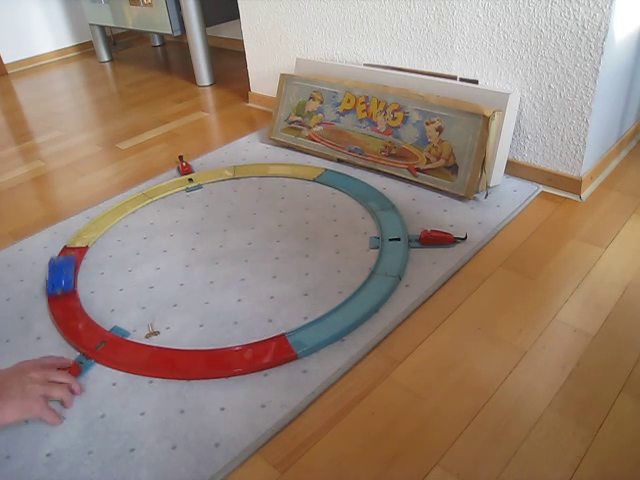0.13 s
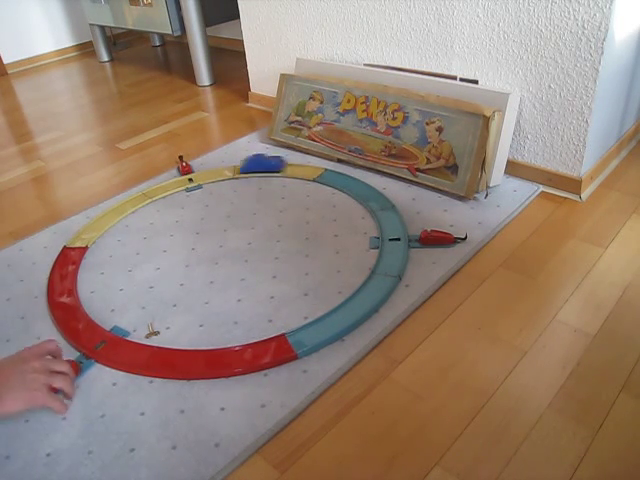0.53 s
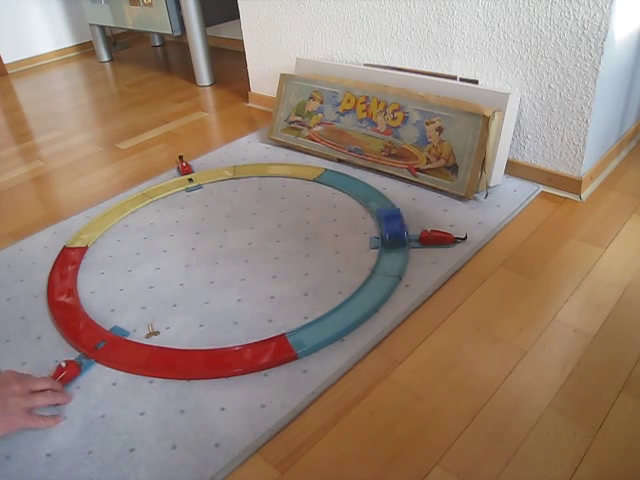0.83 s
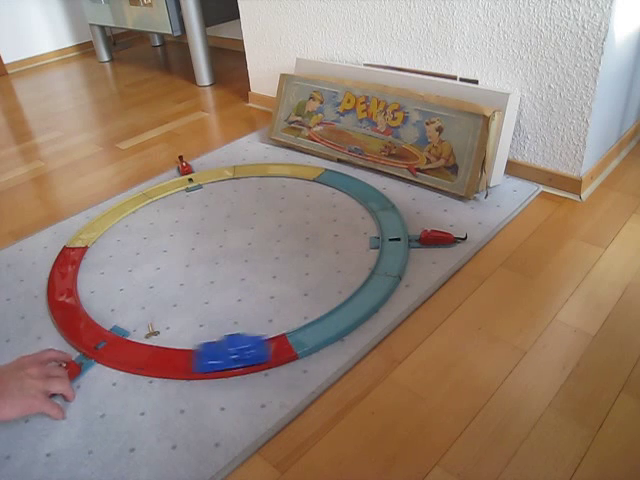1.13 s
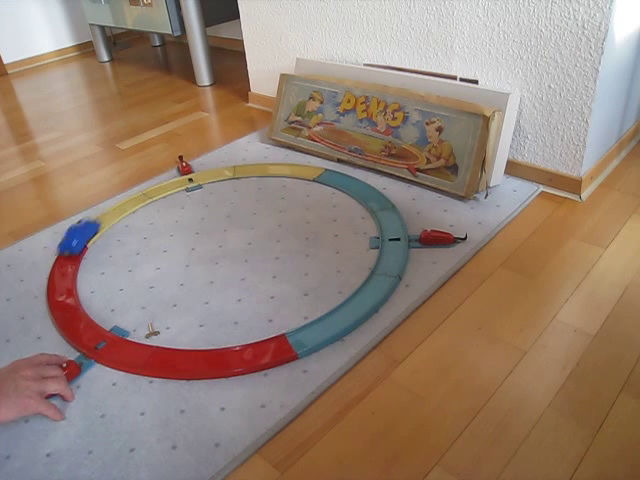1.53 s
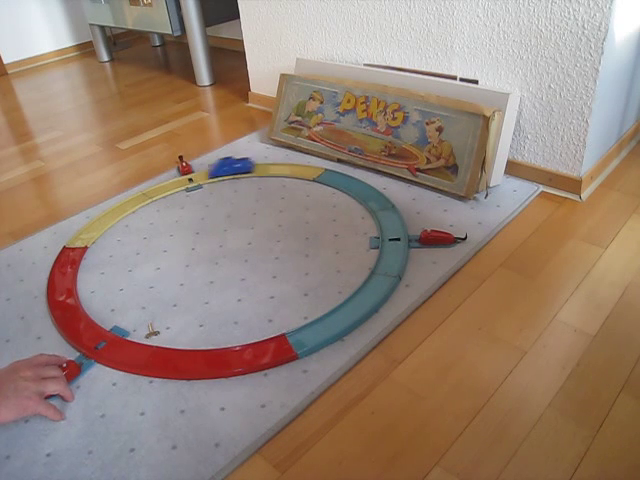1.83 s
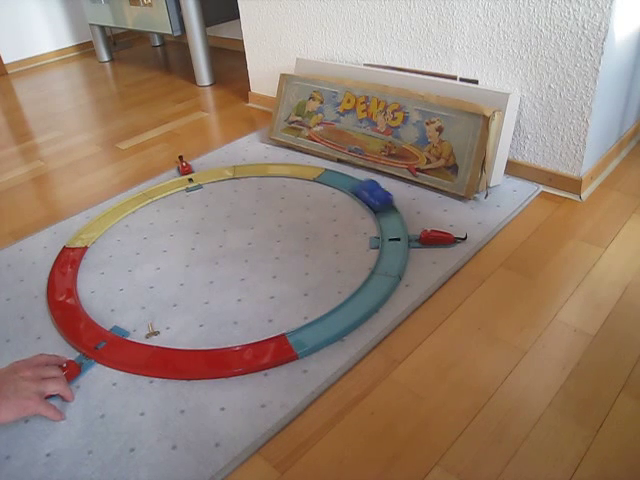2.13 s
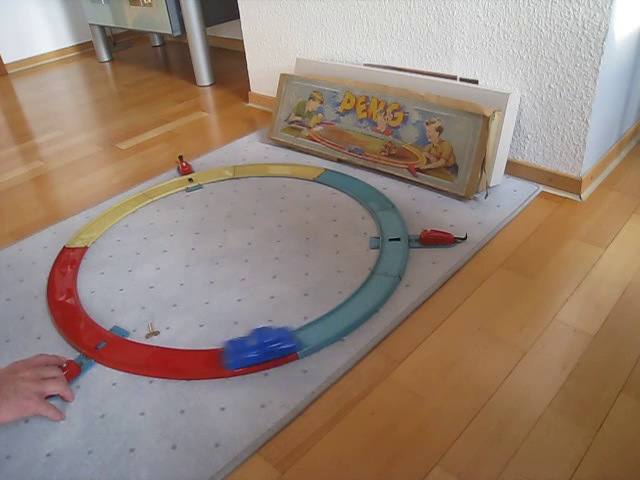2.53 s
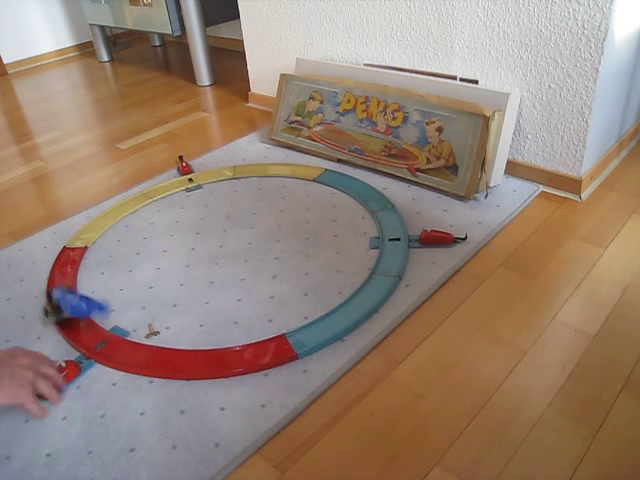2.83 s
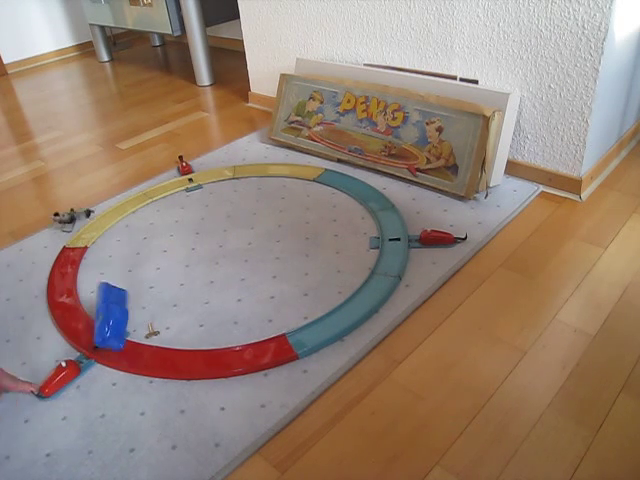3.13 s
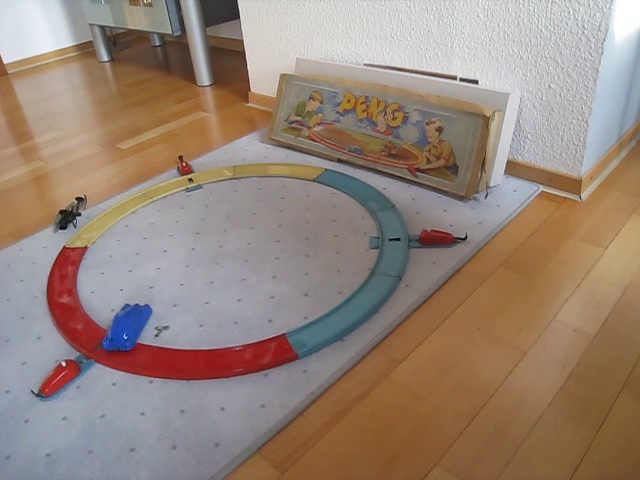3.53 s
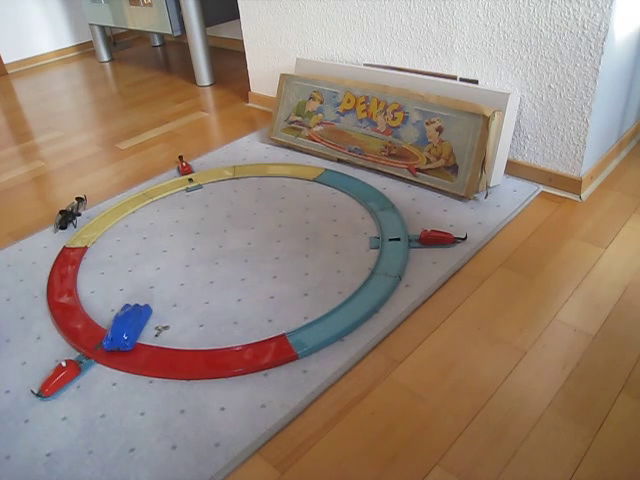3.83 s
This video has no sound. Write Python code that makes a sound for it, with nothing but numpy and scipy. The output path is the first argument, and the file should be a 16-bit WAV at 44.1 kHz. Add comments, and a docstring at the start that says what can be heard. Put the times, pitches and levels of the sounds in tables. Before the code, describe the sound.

A wind-up tin toy car rattles around a metal track in a small room, with a clank at the start, fizzing gears and faintly ringing rails. A wheel gives a thin, brief squeak near 0.8 seconds. At about 2.8 seconds the car derails with a loud crash and dull thud, then tumbles with sharp clanks, motor racing. It lands around 3.2 seconds and the whirring dies away by 3.7.

```python
"""A clockwork tin car rattles round a tin track on a rug, wheels chattering and gear teeth fizzing.
The rails sing under it, and a rubbing wheel squeaks once. It hits the points, derails and tumbles
with the motor racing, then clanks onto its side and runs down. The rug adds a dull thud to the knocks,
a small room answers, and automatic gain control ducks on the loud crashes."""
import sys
import numpy as np
from scipy import signal
from scipy.fft import rfft, irfft, next_fast_len
from scipy.io import wavfile
from scipy.ndimage import uniform_filter1d, map_coordinates

SR = 44100
rng = np.random.default_rng(int(sys.argv[2]) if len(sys.argv) > 2 else 0)


def unload_audio(sound):
    """Save the sound as a 16-bit wav file, at the path given as the first command line argument."""
    columns = np.transpose(np.atleast_2d(sound))
    # keep every value between -1 and 1, then stretch to whole-number steps
    steps = np.round(np.clip(columns, -1, 1) * 32767)
    wavfile.write(sys.argv[1], SR, steps.astype(np.int16))


N = 176400

DERAIL_S, LAND_S = 2.768, 3.235
TEETH_PER_S = 2900
# the clockwork racing and running down off the rails: t/s, whirr level/dB, fizz level/dB
RUN_DOWN = [(2.78, -38, -30), (2.85, -25, -16.5), (2.91, -23.5, -23), (2.99, -29, -24), (3.13, -28, -26),
            (3.2, -38.5, -23), (3.25, -22.5, -27.5), (3.32, -24.5, -31), (3.39, -33, -26.5),
            (3.51, -43, -39.5), (3.6, -49.5, -56), (3.8, -64, -88)]
# hard knocks of the car: t/s, clank level/dB, clash level/dB, tick level/dB, thud level/dB
CAR_KNOCKS = [(.004, -7, -8.5, -9.5, -42), (0.835, -30, -17, -18, -50), (2.7633, -15, -10.5, -10.5, -30),
              (2.7698, 0, 2, 9.5, -1.5), (2.7869, -13, 6, -8, -23), (2.891, -5.5, -10, -11, -45),
              (3.0066, -3.5, -5.5, -9.5, -11), (3.063, -14, -16, -17, -50),
              (3.2232, -29, -14.5, -13.5, -55), (3.2352, -8.5, -10.5, -13, -42),
              (3.2675, -11.5, -22, -28, -50)]
# resonances of the car's tin body: f/Hz, width/Hz, level/dB
BODY_MODES = [(1330, 92, 2.5), (2573, 82, 4)]


def amp(db):
    """Decibels to gain."""
    return 10 ** (np.asarray(db) / 20)


def unit(x):
    """Scale to rms 1."""
    return x / np.sqrt(np.mean(x ** 2) + 1e-20)


def clock():
    """The time of every sample, in seconds."""
    return np.arange(N) / SR


def curves(rows):
    """An automation curve for each column after the time."""
    times, *columns = np.transpose(rows)
    return [np.interp(clock(), times, column) for column in columns]


def after(start_s, fade=0.021):
    """A linear fade-in that begins at start_s."""
    return np.clip((clock() - start_s) / fade, 0, 1)


def wobble(rate):
    """Smooth random modulation, rate knots a second."""
    return map_coordinates(rng.standard_normal(2000), [clock() * rate], mode="wrap")


def grid():
    """The frequency axis of the filters, in Hz."""
    return np.fft.rfftfreq(2 * next_fast_len(N // 2 + 8192), 1 / SR)


def filtered(x, response):
    """x through a response scaled to keep the power of white noise."""
    size = 2 * (len(response) - 1)
    return irfft(rfft(x, size) * response / np.sqrt(np.mean(abs(response) ** 2)))[:N]


def colour(points):
    """A minimum-phase EQ curve through points of f/Hz, level/dB."""
    hz, db = np.transpose(points)
    gain = amp(np.interp(np.log(grid() + 1), np.log(hz + 1), db))
    cepstrum = irfft(np.log(gain + 1e-6))
    causal = np.r_[cepstrum[0], 2 * cepstrum[1:len(cepstrum) // 2]]
    return np.exp(rfft(causal, len(cepstrum)))


def ringing(modes):
    """A resonator bank of alternating polarity, from rows of f/Hz, width/Hz, level/dB."""
    f = grid()
    return sum((-1) ** k * amp(db) * 1j * f * width / (hz * hz - f * f + 1j * f * width)
               for k, (hz, width, db) in enumerate(modes))


def ticks(per_s, scatter_db, t60):
    """Irregular small contacts of uneven size, each a very short noise burst."""
    hits = (rng.random(N) < per_s / SR) * amp(scatter_db * np.clip(rng.standard_normal(N), -2, 2))
    power = signal.lfilter([1], [1, -amp(-120 / (t60 * SR))], hits ** 2)
    return unit(np.sqrt(power) * rng.standard_normal(N))


def bursts(times, levels_db, t60):
    """A dying burst of noise at each time."""
    out, t = np.zeros(N + SR), np.arange(SR // 4) / SR
    decay = np.exp(-np.log(1000) * t / t60)
    for start_s, db in zip(times, levels_db):
        out[round(start_s * SR):][:len(t)] += amp(db) * decay * rng.standard_normal(len(t))
    return out[:N]


def shifting(x, depth_db):
    """Drifting peaks and dips: the tin's fine resonances change as the car moves on."""
    spectrum = signal.stft(x, nperseg=1024)[2]
    patches = uniform_filter1d(rng.standard_normal(spectrum.shape), size=4, axis=0)
    patches = uniform_filter1d(patches, size=7, axis=1)
    return unit(signal.istft(spectrum * amp(depth_db * unit(patches)))[1][:N])


def wheels():
    """Wheels chatter on the tin rails and bump over their joints, setting the rails ringing."""
    # rattle along the laps: t/s, level/dB
    laps = [(0, -19.5), (.15, -21.5), (.33, -20.5), (.7, -21), (1.05, -19.5), (1.35, -21.5), (1.7, -20),
            (2.0, -21.5), (2.7, -19.5)]
    # bumps over the rail joints: t/s, level/dB
    joints = [(.152, -16), (.2, -19.5), (.306, -16), (.352, -15.5), (.977, -18.5), (1.254, -17),
              (1.313, -19), (1.856, -27), (2.064, -18.5), (2.116, -17.5)]
    # tone of wheels on tin: f/Hz, level/dB
    rattle_eq = [(59, -46), (100, -44.5), (381, -21.5), (493, -13.5), (592, -13), (989, -4), (1480, -1),
                 (1750, -4.5), (2430, 0.5), (2760, -3.5), (3510, -0.5), (4450, -4.5), (8000, -13.5),
                 (10400, -20.5), (17600, -120)]
    # rail resonances: f/Hz, width/Hz, level/dB
    rail_modes = [(1430, 140, -13), (2450, 160, 12), (3460, 250, 18.5), (5040, 260, 18)]
    crossing = after(0.757) * (1 - after(0.86, fade=0.07))  # the wheels run light here
    level_db = curves(laps)[0] - 5 * crossing + 0.37 * wobble(55)
    chatter = shifting(ticks(per_s=2200, scatter_db=2.0, t60=0.027), depth_db=1.9)
    bumps = bursts(*np.transpose(joints), t60=0.061)
    drive = chatter * amp(level_db) * (1 - after(DERAIL_S)) + bumps
    rail_ring = filtered(np.roll(drive, SR // 300), ringing(rail_modes))
    return filtered(drive, colour(rattle_eq)) + amp(-12) * rail_ring


def gears():
    """Gear teeth fizz, swelling with each turn of the axle, until the clockwork runs down."""
    # tone of the meshing teeth: f/Hz, level/dB
    fizz_eq = [(2000, -21), (4000, -7), (6500, -3.5), (7700, -6.5), (9500, 0), (11500, -2.5), (13000, 0),
               (14500, -4.5), (17000, -17.5)]
    far_s, lap_s, axle_hz = 1.9, 1.26, 28.1
    far_side = np.cos(2 * np.pi * (clock() - far_s) / lap_s)  # faintest at the far side of each lap
    on_track_db = -27 - 0.9 * far_side + 0.53 * wobble(11.3)
    level_db = np.where(clock() < DERAIL_S, on_track_db, curves(RUN_DOWN)[1])
    turn = np.sin(2 * np.pi * np.cumsum(axle_hz * (1 + 0.088 * wobble(3.99))) / SR)
    teeth = ticks(TEETH_PER_S, scatter_db=-2, t60=0.007) * amp(1.5 * turn)
    return filtered(shifting(teeth, depth_db=1.9) * amp(level_db), colour(fizz_eq))


def room_tone():
    """A faint, steady bed of dark noise."""
    # tone of the background: f/Hz, level/dB
    bed_eq = [(12, -26), (20, -13), (280, -9.5), (17000, -30.5)]
    return amp(-51) * filtered(rng.standard_normal(N), colour(bed_eq))


def room(x, t60=0.4):
    """A small room's diffuse tail, new every fifth of a second as the car changes place."""
    t, out = np.arange(SR // 3) / SR, np.zeros(N + SR)
    block = SR // 5
    for start in range(0, N, block):
        tail = rng.standard_normal(len(t)) * np.exp(-np.log(1000) * t / t60)
        wet = signal.fftconvolve(x[start:start + block], tail / np.linalg.norm(tail))
        out[start:start + len(wet)] += wet
    return out[:N]


def knocks(t60=0.037):
    """Short crashes of tin ring the points, until the car lands on its hollow side panel."""
    # midrange body of a knock: f/Hz, level/dB
    clank_eq = [(200, -42), (600, -10.5), (1400, -4), (2300, -4.5), (5000, -7), (12000, -66)]
    # its bright splash: f/Hz, level/dB
    clash_eq = [(800, -28), (4700, 5), (6200, 3.5), (7100, 4), (8500, 4), (16000, -30)]
    # its sharp top edge: f/Hz, level/dB
    tick_eq = [(3000, -47), (9200, 6.5), (10500, 7), (12500, 13.5), (14500, -0.5), (17000, -19)]
    # resonances of the struck points: f/Hz, width/Hz, level/dB
    points_modes = [(1395, 20, -3), (4630, 21, 0), (7100, 55, -2)]
    times, *layers_db, _ = np.transpose(CAR_KNOCKS)
    crash = sum(filtered(bursts(times, db, t60), colour(eq))
                for db, eq in zip(layers_db, (clank_eq, clash_eq, tick_eq)))
    before_landing = crash * (1 - after(LAND_S))
    points = filtered(np.roll(before_landing, SR // 1000), ringing(points_modes))
    panel_mode = (1230, 300, 0)  # f/Hz, width/Hz, level/dB
    landing = bursts([LAND_S], levels_db=[-4], t60=t60)
    panel = filtered(landing, ringing(BODY_MODES + [panel_mode]))
    return crash + amp(-13.5) * points + panel


def rug_thuds():
    """The rug takes each knock with a dead, dry thud."""
    # tone of the damped impact: f/Hz, level/dB
    thud_eq = [(200, -13), (600, -4), (2000, -24)]
    times, *_, thud_db = np.transpose(CAR_KNOCKS)
    return filtered(bursts(times, thud_db, t60=0.0069), colour(thud_eq))


def singing_rails(sigma_s=0.082, q=22):
    """A rail piece swells at its own resonance while the car is on it."""
    # peak of each swell: t/s, f/Hz, level/dB
    swells = [(.42, 3530, -28), (.68, 3290, -28.5), (1.05, 3820, -33), (1.17, 4700, -31),
              (1.34, 5400, -29.5), (1.53, 3360, -28.5), (1.79, 3470, -27.5), (2.18, 3600, -27.5)]
    out = np.zeros(N)
    for peak_s, hz, db in swells:
        swell = amp(db) * np.exp(-0.5 * ((clock() - peak_s) / sigma_s) ** 2)
        out += swell * filtered(rng.standard_normal(N), ringing([(hz, hz / q, 0)]))
    return out


def wheel_squeak(roughness=0.02):
    """A wheel rubs the rail in a thin, rough, rising squeak."""
    # path of the squeak: t/s, f/Hz, level/dB
    glide = [(.762, 9450, -19), (.773, 9100, -13), (.779, 11200, -27), (.789, 13500, -13.5),
             (.797, 13800, -31), (.825, 13900, -34)]
    hz, db = curves(glide)
    phase = 2 * np.pi * np.cumsum(hz * (1 + roughness * wobble(1500))) / SR
    gate = after(glide[0][0]) * (1 - after(glide[-1][0]))
    return amp(db) * np.sin(phase) * gate


def loose_motor():
    """Off the rails the motor races and shakes the body, which rings more once it lies on its side."""
    # tone of the whirr as the car tumbles: f/Hz, level/dB
    tumble_eq = [(200, -38), (450, -23), (530, -10), (650, -12.5), (1600, -6), (3200, -9.5), (5000, -8),
                 (9000, -16.5), (14000, -38)]
    # tone of the whirr with the car on its side: f/Hz, level/dB
    side_eq = [(300, -35), (520, -21), (620, 1.5), (1500, 5.5), (2650, 2), (4500, -3.5), (9000, -11.5),
               (14000, -27)]
    effort = amp(curves(RUN_DOWN)[0]) * after(DERAIL_S)
    shake = lambda: effort * ticks(TEETH_PER_S, scatter_db=1, t60=0.017)
    lying = after(LAND_S)
    tumbling = amp(7) * filtered(shake() * (1 - lying), colour(tumble_eq))
    whirr = amp(1.5) * filtered(shake() * lying, colour(side_eq))
    body_ring = amp(-4) * filtered(shake() * lying, ringing(BODY_MODES))
    return tumbling + whirr + body_ring


def scene():
    """Mono mix: the toy and its reverb, with dry thuds and room tone underneath."""
    toy = wheels() + singing_rails() + gears() + loose_motor() + knocks() + wheel_squeak()
    bed = room_tone()
    return (toy + amp(-9.5) * room(toy) + rug_thuds() + bed)[None]


def record(dry):
    """Gain control ducks fast on loud peaks and eases back; then clipping and a high cut."""
    threshold_db, detect_s, recover_db_per_s, top_hz = -12, 0.0013, 90, 17500
    pole = np.exp(-1 / (detect_s * SR))
    power = signal.lfilter([1 - pole], [1, -pole], dry[0] ** 2)
    over_db = np.maximum(10 * np.log10(power + 1e-12) - threshold_db, 0)
    recovery = recover_db_per_s * clock()
    duck_db = np.maximum.accumulate(over_db + recovery) - recovery
    clipped = np.clip(dry * amp(-duck_db), -1, 1)
    return irfft(rfft(clipped) * (np.fft.rfftfreq(N, 1 / SR) < top_hz), N)


dry = scene()
out = record(dry)
unload_audio(out)
```